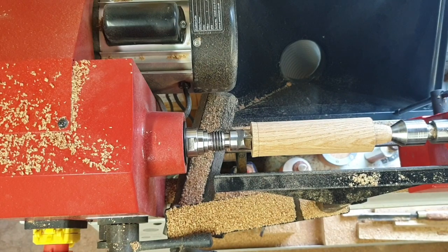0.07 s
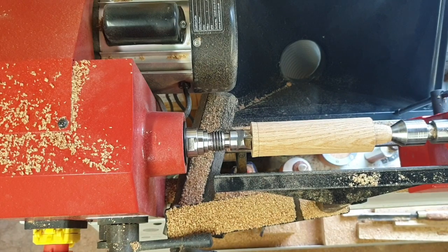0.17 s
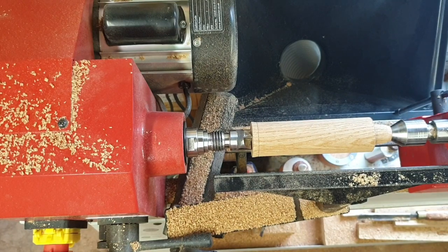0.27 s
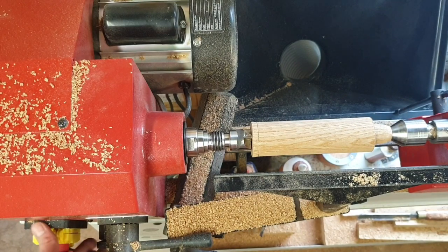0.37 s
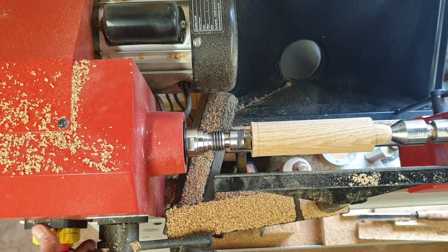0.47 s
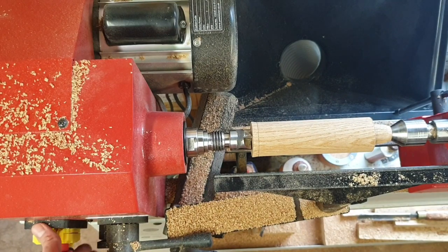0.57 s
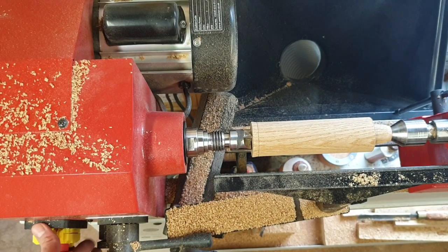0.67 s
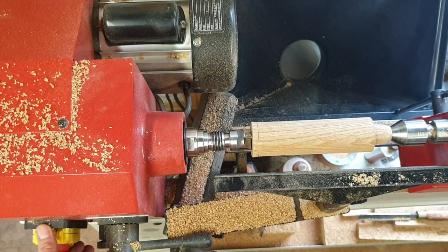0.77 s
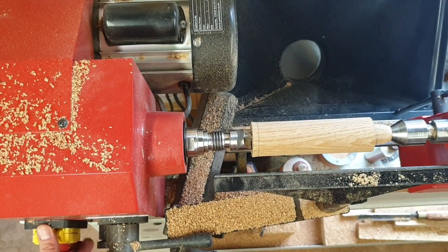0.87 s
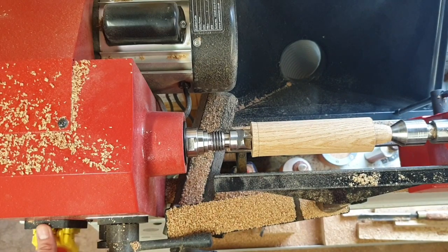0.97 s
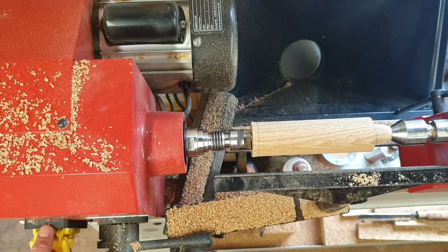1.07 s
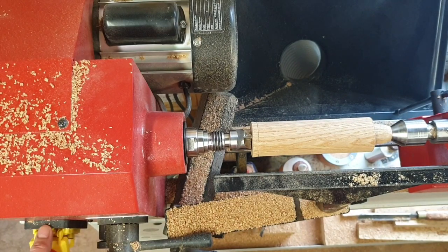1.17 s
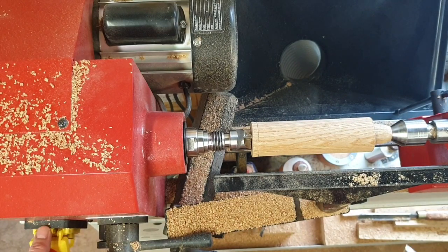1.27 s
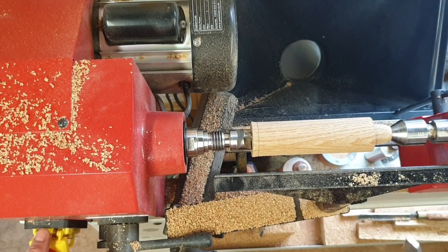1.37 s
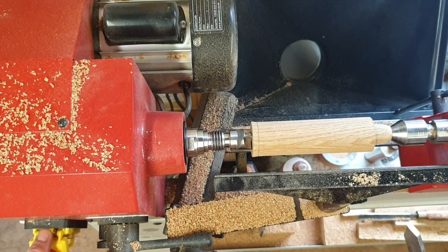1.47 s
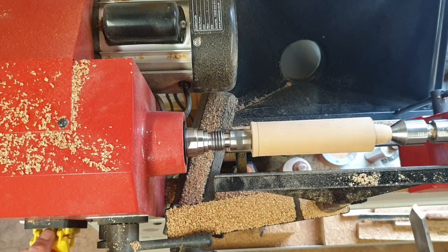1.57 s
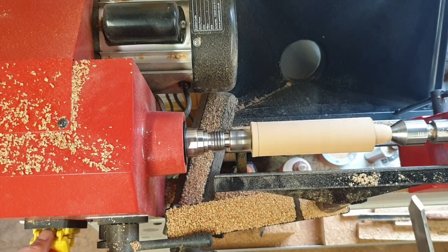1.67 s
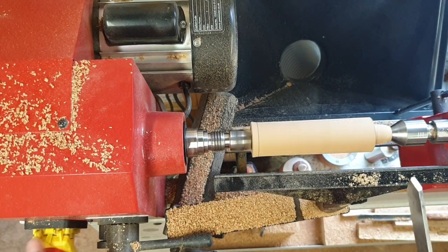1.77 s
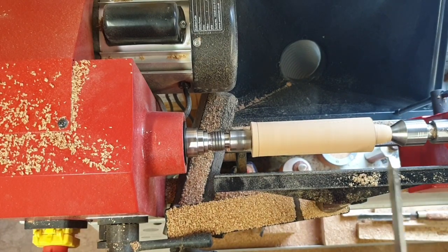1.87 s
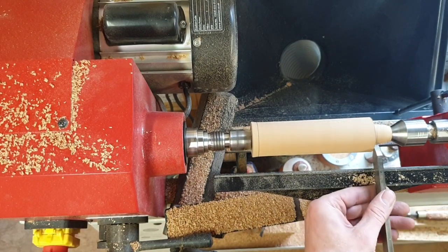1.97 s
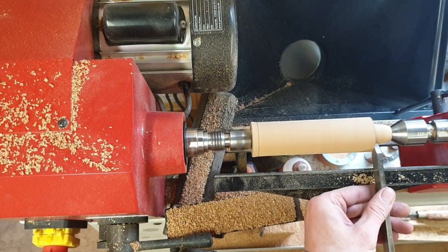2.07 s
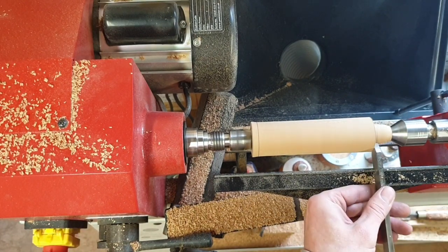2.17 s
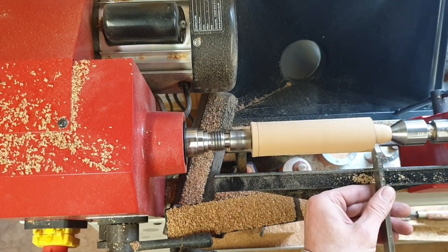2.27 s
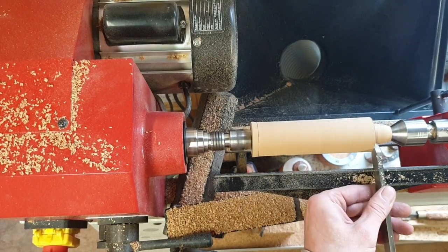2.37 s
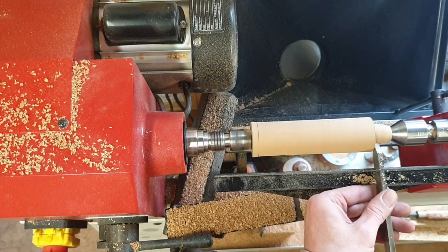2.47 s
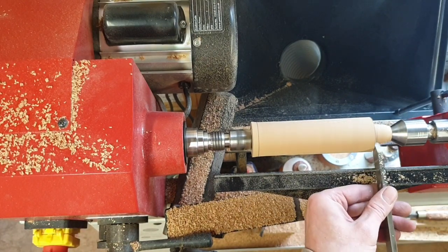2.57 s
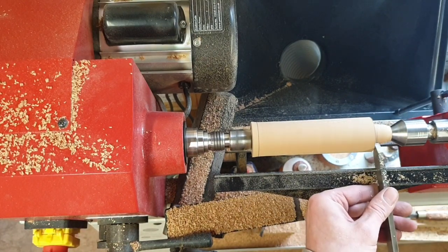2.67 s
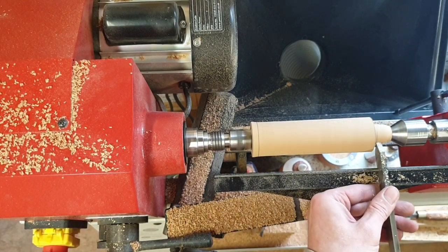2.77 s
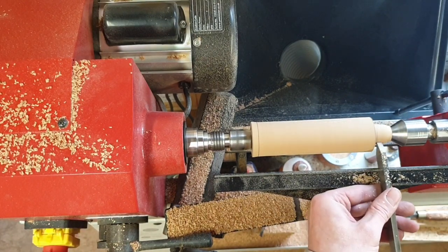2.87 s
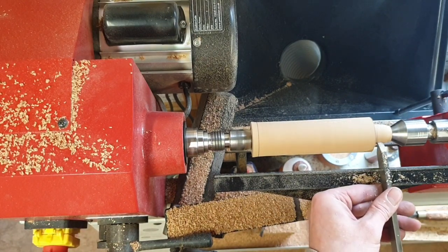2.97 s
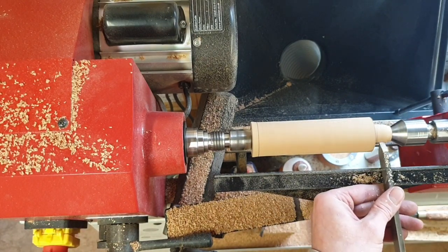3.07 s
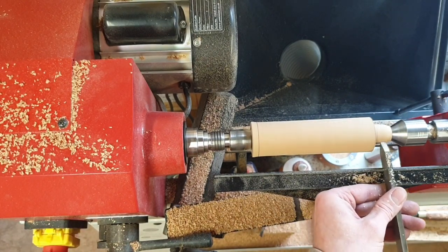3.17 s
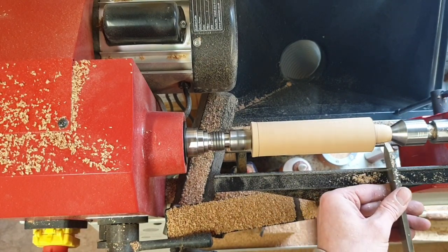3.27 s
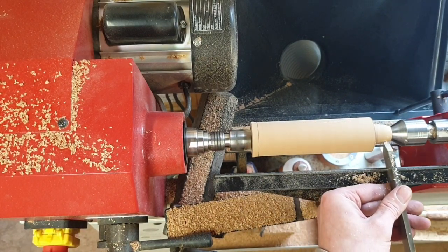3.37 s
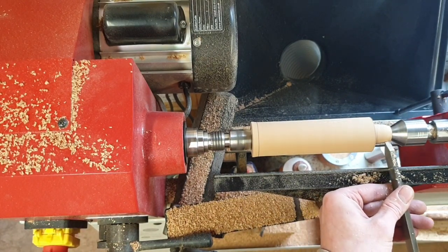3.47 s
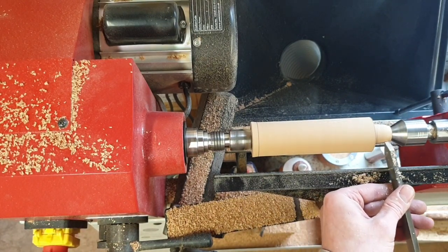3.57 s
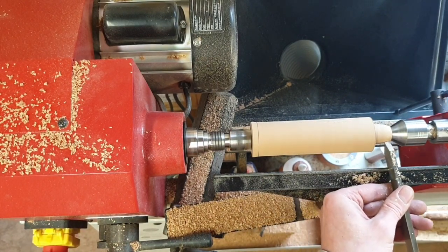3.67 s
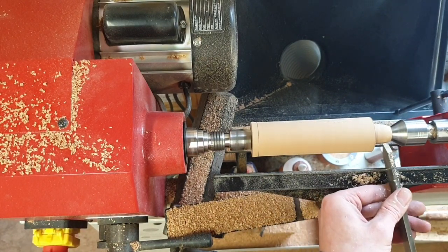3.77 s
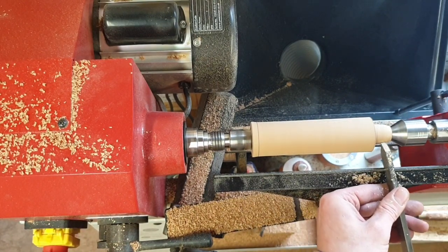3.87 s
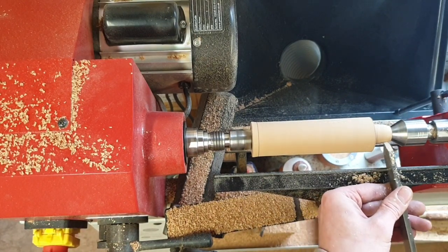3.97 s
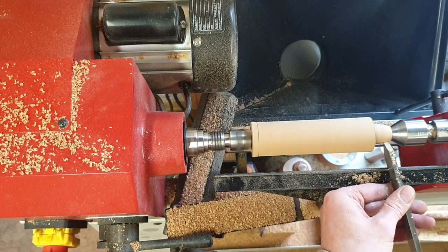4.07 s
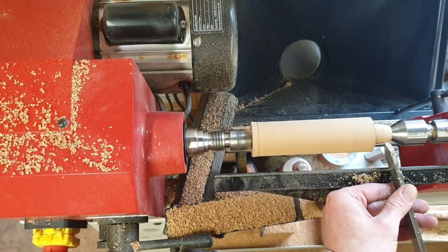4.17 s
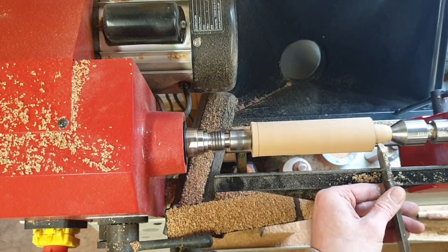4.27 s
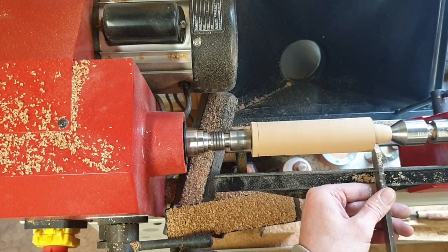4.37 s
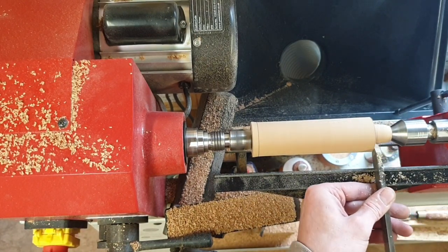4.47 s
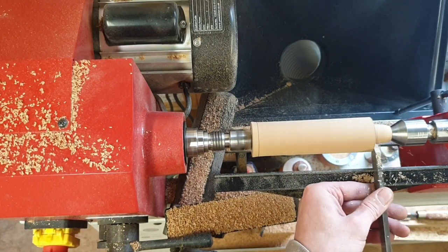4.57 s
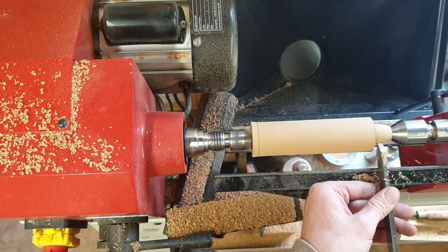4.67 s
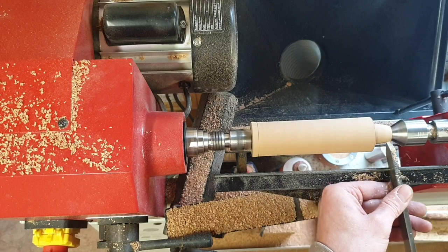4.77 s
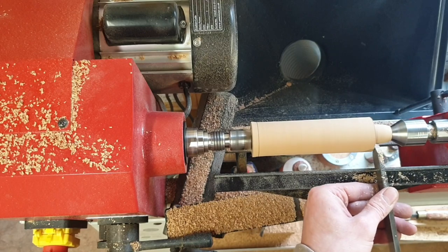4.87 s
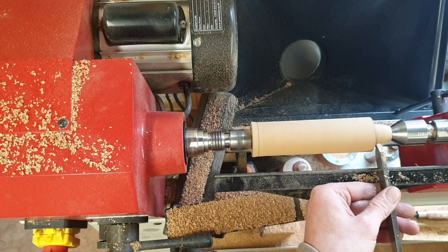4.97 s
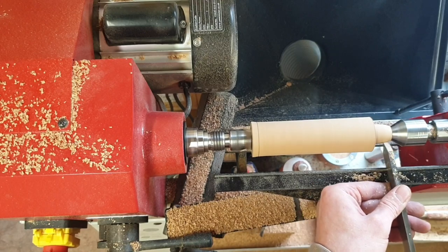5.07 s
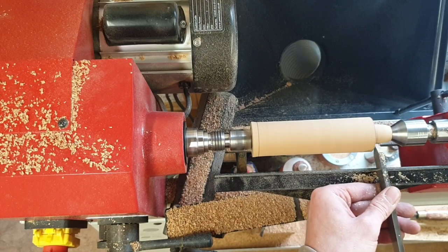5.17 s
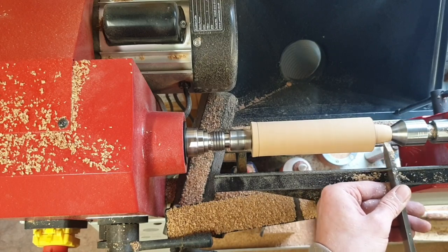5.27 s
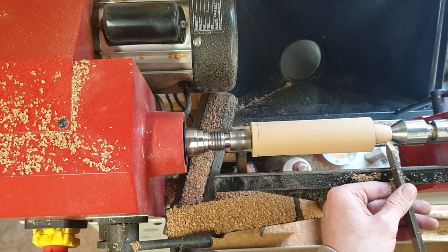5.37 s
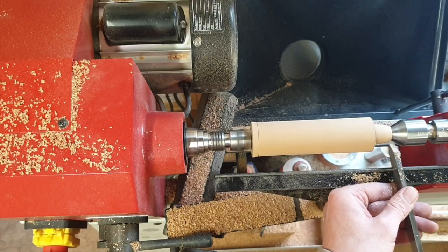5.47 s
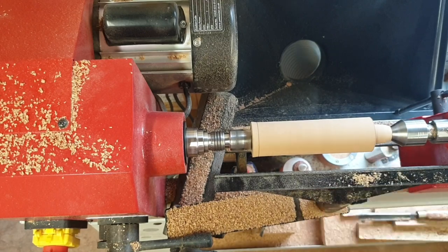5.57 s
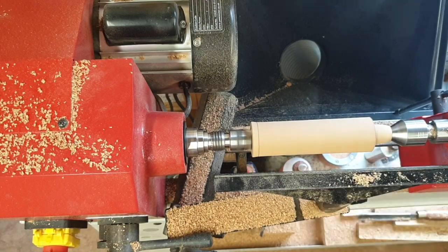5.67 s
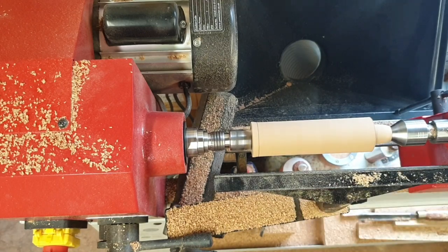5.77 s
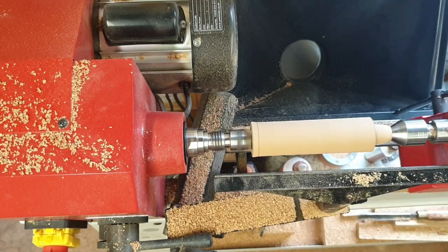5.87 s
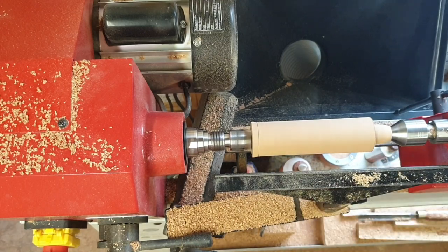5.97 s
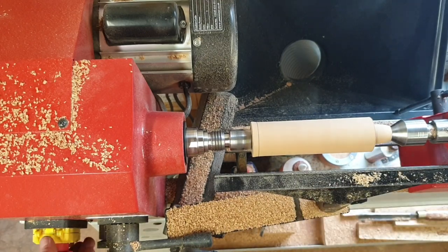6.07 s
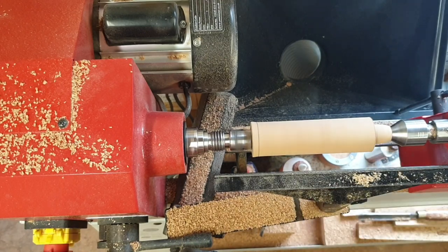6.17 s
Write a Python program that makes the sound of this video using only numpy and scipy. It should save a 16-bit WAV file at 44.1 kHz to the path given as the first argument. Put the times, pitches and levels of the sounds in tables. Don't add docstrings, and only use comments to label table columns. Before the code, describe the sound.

Soft steps, a button click and a hard contactor slam start a humming, whirring lathe; short dry scraping strokes on wood follow until a sharp switch-off.

```python
import sys
import numpy as np
from scipy import signal
from scipy.fft import rfft, irfft, next_fast_len
from scipy.io import wavfile
from scipy.ndimage import uniform_filter1d, map_coordinates

SR = 44100
rng = np.random.default_rng(int(sys.argv[2]) if len(sys.argv) > 2 else 0)


def makeup_ratio(level_db):
    decades = np.asarray(level_db, float) / 20
    return 10 ** decades


def generate_wav(sig):
    pcm = np.round(np.clip(np.atleast_2d(sig).T, -1, 1) * 32767).astype(np.int16)
    wavfile.write(sys.argv[1], SR, pcm)


N = 274698
T = np.arange(N) / SR
LEAD_S = 6.95 / 44100


def unit(x):
    return x / np.sqrt(np.mean(x ** 2) + 1e-20)


def along(points, hz):
    f, v = np.transpose(points)
    return np.interp(np.log(hz + 1), np.log(f + 1), v)


def colour(points):
    closed = [(points[0][0] * .8, -120), *points, (points[-1][0] * 1.2, -120)]
    return lambda hz: makeup_ratio(along(closed, hz))


def curve(rows, fade):
    s, db = np.transpose(rows)
    return np.interp(T, np.r_[s[0] - fade, s, s[-1] + fade], np.r_[-110, db, -110])


def wobble(rate):
    return map_coordinates(rng.standard_normal(int(N * rate / SR) + 4), [np.arange(N) * rate / SR])


def ramp(start, length):
    return np.clip((T - start) / length, 0, 1)


def burst(start, rise, t60):
    return ramp(start, rise) ** 2 * makeup_ratio(-60 * np.maximum(T - start - rise, 0) / t60)


def wandering_tone(hz, wander_hz):
    return np.sin(2 * np.pi * (hz * T + np.cumsum(wander_hz * wobble(30)) / SR))


def patchy_noise(patchy_db):
    cells = (N // 256 + 2, 257)
    z = rng.standard_normal((3, *cells)) + 1j * rng.standard_normal((3, *cells))
    field = uniform_filter1d(rng.standard_normal(cells), size=8, axis=0)
    field = uniform_filter1d(field, size=5, axis=1)
    frames = irfft(z * makeup_ratio(patchy_db * unit(field))) * np.sin(np.pi * np.arange(512) / 512)
    return (frames[:, :-1, 256:] + frames[:, 1:, :256]).reshape(3, -1)[:, :N]


# (frequency [Hz], likeness [0-1])
LIKENESS = [(60, .99), (450, .95), (650, .6), (1000, .55), (2500, .55), (4000, .35), (8000, .35),
            (12000, .4), (14500, .6)]


def ports(gain, pan, patchy_db, shape=1):
    size = next_fast_len(N + 8192)
    hz = np.fft.rfftfreq(size, 1 / SR)
    both, *own = rfft(patchy_noise(patchy_db) * shape, size)
    alike = np.clip(along(LIKENESS, hz), 0, 1)
    sign = np.array([[1], [-1]])
    shared = np.sqrt(alike) * both * np.exp(1j * np.pi * hz * LEAD_S * sign)
    pair = shared + np.sqrt(1 - alike) * np.array(own)
    pair = pair * gain(hz) * makeup_ratio(sign * along(pan, hz) / 2)
    return unit(irfft(pair, size)[:, :N])


CENTRE = [(1000, 0)]

# (frequency [Hz], level [dB per Hz])
ROOM_COLOUR = [(120, -33), (200, -1.5), (773, -5.5), (917, -5), (999, -5.5), (3970, -7.5), (4640, -12),
               (6000, -20), (7800, -54), (13200, -120)]


def room(stir):
    return (makeup_ratio(-78) + makeup_ratio(3.0) * stir) * ports(colour(ROOM_COLOUR), CENTRE, patchy_db=0.0)


# (frequency [Hz], level [dB per Hz])
HISS_COLOUR = [(1760, -38), (3000, 3), (3310, -21), (8110, -7), (12900, -12), (16000, -9)]


def microphone_hiss(stir):
    return (makeup_ratio(-79) + makeup_ratio(0.5 - 5.5) * stir) * ports(colour(HISS_COLOUR), CENTRE, patchy_db=.7)


# (time [s], thud level [dB], stir of the room [dB], rise [s], t60 [s])
STEP_EVENTS = [
    (.028, -47, -81, .006, 0.46),
    (.068, -41, -84, .018, 0.14),
    (.126, -54.5, -99, 0.022, 1.1),
    (.305, -55, -75, 0.036, .25),
    (.37, -69, -86, 0.018, 0.61),
    (.685, -55, -80, 0.018, 0.41),
    (.735, -57, -80, 0.022, 0.14),
    (.960, -62, -61, 0.081, 0.58),
    (1.260, -74, -86, 0.099, 1.7),
]


def movements():
    floor, stir = np.zeros(N), np.zeros(N)
    for s, thud_db, stir_db, rise, t60 in STEP_EVENTS:
        swell = burst(s, rise, t60)
        floor += makeup_ratio(thud_db) * swell
        stir += makeup_ratio(stir_db) * swell
    return floor, stir


# (frequency [Hz], level [dB per Hz])
FLOOR_COLOUR = [(25, -22), (60, 3), (110, -1), (170, -7), (260, -18), (420, -23)]


def footfalls(floor):
    hush = makeup_ratio(-74)
    return (floor * makeup_ratio(0.99 * wobble(25)) + hush) * ports(colour(FLOOR_COLOUR), [(100, 3.3)], patchy_db=2.5)


def puffs(rows, rise):
    out, size = np.zeros((2, N + SR)), SR // 2
    t, hz = np.arange(size) / SR, np.fft.rfftfreq(size, 1 / SR) + 1
    swell = np.sin(np.pi / 2 * np.clip(t / rise, 0, 1)) ** 2
    for s, db, centre_hz, octaves, t60 in rows:
        both, left, right = rng.standard_normal((3, size))
        band = np.exp(-.5 * (np.log2(hz / centre_hz) / octaves) ** 2)
        puff = irfft(rfft([both + 2.3 * left, both + 1.8 * right]) * band)
        decay = makeup_ratio(db - 60 * np.maximum(t - rise, 0) / t60)
        out[:, round(s * SR):][:, :size] += decay * swell * unit(puff)
    return out[:, :N]


# (time [s], level [dB], centre [Hz], width [octaves], t60 [s])
KNOCK_EVENTS = [(0.032, -51, 200, 0.7, 0.22), (.079, -52, 596, 0.8, 0.19), (.205, -69, 250, .99, .11),
                (.7, -64, 298, 0.69, .28), (1.39, -66, 330, .51, 0.37), (1.056, -42.5, 2600, 0.85, 0.13),
                (1.057, -40.5, 1270, 1.05, 0.092), (1.066, -51, 5100, .11, 0.15),
                (1.199, -64, 4000, .82, .06), (1.614, -39, 4000, 2.5, .12), (1.625, -46, 550, 0.78, .5),
                (6.065, -35, 3200, 0.77, .056)]


def knocks():
    return puffs(KNOCK_EVENTS, rise=0.0029)


# (time [s], level [dB], centre [Hz], width [octaves], t60 [s])
TICK_EVENTS = [(.337, -64, 1900, 0.65, 0.27), (.372, -57, 1800, .45, .12), (.539, -69, 6000, 1.3, .04),
               (.699, -66, 1300, 1.3, 0.16), (1.003, -50.5, 2460, 1.06, 0.29),
               (1.058, -44.5, 9800, .31, 0.1), (1.168, -66, 3000, 1.1, .04),
               (1.665, -38.5, 4000, 1.1, .088), (1.845, -49, 9000, 1, .02), (1.866, -49, 5000, 1.6, .033),
               (2.048, -39, 4500, 1, .05)]


def ticks():
    return puffs(TICK_EVENTS, rise=0.0019)


# (time [s], level [dB], centre [Hz], width [octaves], t60 [s])
RUSTLE_EVENTS = [
    (.42, -74, 6000, .6, .1),
    (.77, -63, 4800, .13, .17),
    (.77, -70, 6000, 0.64, .15),
    (.76, -71, 14000, 0.48, .3),
    (1.01, -61, 8000, .7, .11),
    (1.43, -67.5, 5000, 0.11, .25),
]


def rustles():
    return puffs(RUSTLE_EVENTS, rise=0.051)


# (frequency [Hz], level [dB], t60 [s])
COVER_MODES = [(284, 0, 0.39), (425, -5, 0.53), (906, -4.5, 0.27), (1450, -8, 0.18), (4850, -12, .06)]
BUTTON_MODES = [(1180, -1.5, 0.14), (4500, -7, 0.048), (10300, -4, .03)]
CONTACTOR_MODES = [(1220, -25, .07), (1720, -5, 0.091), (2030, 0.5, 0.039), (3120, -11, 0.069),
                   (5500, -19, 0.079)]
# (time [s], level [dB])
SWITCH_BLOWS = [
    (1.008, -44),
    (1.616, -34.5),
    (1.664, -18.5),
    (6.074, -25),
]


def switch():
    out, t = np.zeros((2, N + SR)), np.arange(SR // 2) / SR
    struck = (COVER_MODES, BUTTON_MODES, CONTACTOR_MODES, CONTACTOR_MODES)
    for (s, db), modes in zip(SWITCH_BLOWS, struck):
        drift = np.cumsum(rng.normal(0, 0.072, (2, len(t))), axis=1)
        ring = sum(makeup_ratio(level - 60 * t / t60) * np.sin(2 * np.pi * hz * t + drift) for hz, level, t60 in modes)
        onset = 1 - np.exp(-t / 0.00082)
        out[:, round(s * SR):][:, :len(t)] += makeup_ratio(db) * ring * onset
    return out[:, :N]


# (time [s], level [dB])
PIPE_LEVEL = [(1.08, -88), (1.2, -80), (1.35, -81), (1.5, -76), (1.62, -75)]


def far_pipe():
    resonance = lambda hz: 1 / (1 + (2 * (hz - 1345) / 190) ** 2)
    return makeup_ratio(curve(PIPE_LEVEL, fade=.05)) * ports(resonance, CENTRE, patchy_db=2.5)


def spindle():
    turns_per_s, start_turns = 43.05, -.35
    turns = turns_per_s * T + start_turns + .07 * wobble(25)
    return (.5 + .5 * np.cos(2 * np.pi * turns)) ** 2


# (frequency [Hz], left over right [dB])
MACHINE_PAN = [(400, 1.9), (1200, 1.5), (3000, 0), (7800, -2), (8600, 9.5), (12000, 1.5), (15000, 4)]

# (frequency [Hz], level [dB], wander [Hz], flutter [dB])
HUM_LINES = [(200, -8, 5, 1.5), (296, -10, 11, 3), (351, 0, 4.5, 1.5), (404, -2.5, 8, 2)]
# (frequency [Hz], level [dB per Hz])
DRUM_COLOUR = [(170, -10), (230, -10.5), (300, 0), (380, 3), (460, -0.5), (520, -13.5), (600, -49)]


def hum(turn):
    lines = sum(makeup_ratio(db + flutter_db * wobble(11)) * wandering_tone(hz, wander)
                for hz, db, wander, flutter_db in HUM_LINES)
    drum = ports(colour(DRUM_COLOUR), MACHINE_PAN, patchy_db=-2.5, shape=makeup_ratio(1.35 * turn))
    return unit(0.8 * unit(lines) * makeup_ratio([[.6], [-.6]]) + 0.59 * drum)


# (frequency [Hz], level [dB per Hz])
RUMBLE_COLOUR = [(15, -47), (25, -20.5), (64, 0), (102, -1), (161, -8.5), (175, -2.5), (230, -9),
                 (390, -120)]


def rumble(load_db):
    level_db = -39.5 + 0.59 * load_db + 1 * wobble(14)
    return makeup_ratio(level_db) * ports(colour(RUMBLE_COLOUR), [(100, .3)], patchy_db=1.5)


# (frequency [Hz], level [dB per Hz])
RATTLE_COLOUR = [(280, -31), (480, -2), (657, -6), (1150, -4), (1320, -7), (1720, -1), (1950, -9),
                 (2090, -4), (4230, -13), (7000, -45), (9100, -49), (15400, -120)]
# (frequency [Hz], width [Hz], level [dB])
PANEL_MODES = [(640, 40, 0), (1147, 32, 3), (1565, 70, 1), (1690, 30, 3), (2125, 50, 0)]


def rattle(turn, load_db):
    shake = makeup_ratio(-31.5 + 1.2 * load_db + 1.04 * wobble(14))
    shake = shake + makeup_ratio(-31) * burst(1.664, 0.0036, t60=.6)
    ringing = lambda hz: 1 + sum(makeup_ratio(db) / (1 + (2 * (hz - c) / w) ** 2) for c, w, db in PANEL_MODES) * .5
    clatter = makeup_ratio(1.77 * turn * np.exp(0.64 * wobble(43)) + 0.9 * wobble(12))
    steel = lambda hz: colour(RATTLE_COLOUR)(hz) * ringing(hz)
    return shake * ports(steel, MACHINE_PAN, patchy_db=2.0, shape=clatter)


# (frequency [Hz], level [dB], wander [Hz])
WHINE_LINES = [(639, -50, 8), (1148, -50, 9), (1689, -49, 9), (1780, -52, 14)]


def whine():
    lines = sum(makeup_ratio(db + 3.5 * wobble(9)) * wandering_tone(hz, wander) for hz, db, wander in WHINE_LINES)
    return np.array([lines, np.roll(lines, round(LEAD_S * SR))])


# (time [s], hum level [dB])
MOTOR_LOAD = [(1.62, -54), (1.67, -35), (1.86, -24.5), (1.94, -28), (2.76, -28), (2.79, -28), (2.84, -29),
              (4.66, -29), (4.71, -26.5), (4.88, -31), (4.9, -28.5), (5.85, -29), (5.91, -28),
              (6.06, -27.5), (6.2, -42), (6.23, -52)]


def motor(turn):
    hum_db = curve(MOTOR_LOAD, fade=.008)
    load_db = hum_db + 29
    shaken = (hum_db > -100) * rumble(load_db)
    return makeup_ratio(load_db) * whine() + shaken + makeup_ratio(hum_db + 0.98) * hum(turn) + rattle(turn, load_db)


# (time [s], level [dB])
CHIP_GUSTS = [
    (1.775, -49),
    (1.845, -46),
    (1.870, -45),
    (1.978, -50),
    (2.052, -48),
]


def air_level():
    on_s, off_s, coast_db_per_s = 1.71, 6.076, 195
    coast_db = coast_db_per_s * np.maximum(T - off_s, 0)
    steady = ramp(on_s, .063) * makeup_ratio(-50 + 0.58 * wobble(15) - coast_db)
    flung = sum(makeup_ratio(db - np.maximum(200 * (s - T), 900 * (T - s))) for s, db in CHIP_GUSTS)
    return steady + flung * ramp(on_s, .01)


# (frequency [Hz], level [dB per Hz])
WHIRR_COLOUR = [(3240, -16.5), (5500, -4.5), (9030, -16), (10600, -16), (15000, -20), (16000, -19)]


def spindle_air(turn):
    pulse = makeup_ratio(4 * turn ** 2 * np.exp(.3 * wobble(43)))
    return air_level() * ports(colour(WHIRR_COLOUR), MACHINE_PAN, patchy_db=.7, shape=pulse)


# (time [s], length [s], level [dB], change over the stroke [dB], brightness [dB])
TOOL_STROKES = [(2.112, 0.3485, -37.5, 4, -1), (2.513, 0.13, -37.5, 3.5, 1.5), (2.742, 0.12, -37, 1.5, 2),
                (2.907, 0.084, -36.5, 4, 1), (3.007, 0.1, -39.5, 3.5, 5), (3.107, 0.078, -34.5, -10, 5),
                (3.156, 0.094, -45.5, 10, 5.5), (3.282, 0.14, -42, 12, 4.5), (3.442, 0.17, -44, 9, 3.5),
                (3.638, 0.11, -42, 6, 5), (3.784, 0.085, -38.5, 4.5, 3), (3.882, 0.063, -35, -0.5, 6.5),
                (3.927, 0.11, -39.5, -6, 4.5), (4.064, 0.17, -41, 4.5, 3.5), (4.261, 0.15, -36, -2, 3),
                (4.391, 0.25, -32.5, -5, -3.5), (4.611, 0.21, -33.5, -7.5, 3.5), (4.830, 0.17, -47, 15, -1),
                (4.972, 0.16, -33.5, -5.5, 4.5), (5.184, 0.3, -35, -10.5, 5)]


def strokes():
    bite_s, lift_s, edge_db = 0.023, 0.031, 21
    pressure, bright = np.full(N, 1e-7), 0
    for s, length, db, change_db, bright_db in TOOL_STROKES:
        touch = np.minimum(ramp(s, bite_s), 1 - ramp(s + length - lift_s, lift_s))
        gain = (touch > 0) * makeup_ratio(db + change_db * ramp(s, length) - edge_db * (1 - touch))
        pressure = pressure + gain
        bright = bright + gain * bright_db
    return pressure, bright / pressure


# (frequency [Hz], level [dB per Hz])
GRIT_COLOUR = [(550, -35), (700, 6), (1100, -6.5), (2500, 2), (3600, 0), (4800, -8.5), (5600, -1.5),
               (7200, -11.5), (8200, -1.5), (9500, -0.5), (10800, -6), (12300, -2.5), (15600, -3),
               (16000, -17.5)]
# (frequency [Hz], left over right [dB])
TOOL_PAN = [(3000, -1), (7000, -2), (8500, 3.5), (10800, 6), (12000, 4), (15000, 1)]


def tool(turn):
    pressure, bright_db = strokes()
    edge = makeup_ratio(np.clip(bright_db - 2.0, -6, 6))
    grains = makeup_ratio(2.7 * turn * np.exp(0.39 * wobble(43)) + 1.32 * wobble(70) + 1.1 * wobble(900))
    rub = ports(colour(GRIT_COLOUR), TOOL_PAN, patchy_db=2.0, shape=grains)
    dull = signal.sosfiltfilt(signal.butter(6, 10800, fs=SR, output="sos"), rub)
    return makeup_ratio(8.5) * pressure * (dull + edge * (rub - dull))


def scene():
    floor, stir = movements()
    workshop = room(stir) + microphone_hiss(stir) + footfalls(floor) + far_pipe()
    handling = knocks() + ticks() + rustles() + switch()
    turn = spindle()
    return workshop + handling + motor(turn) + spindle_air(turn) + tool(turn)


def top_cut(x):
    return signal.sosfilt(signal.butter(12, 16740, fs=SR, output="sos"), x)


def record(dry):
    top_hz, size = 15950, next_fast_len(N)
    passed = np.fft.rfftfreq(size, 1 / SR) < top_hz
    mix = irfft(rfft(dry, size) * passed, size)[:, :N]
    return top_cut(mix)


dry = scene()
out = record(dry)
generate_wav(out)
```